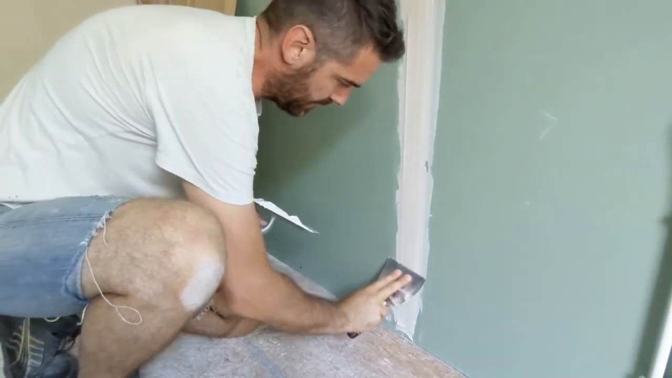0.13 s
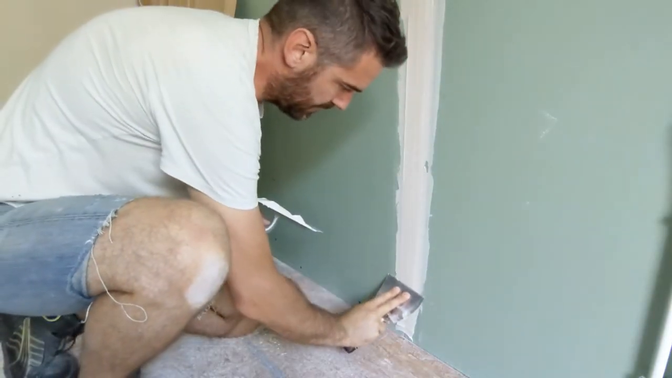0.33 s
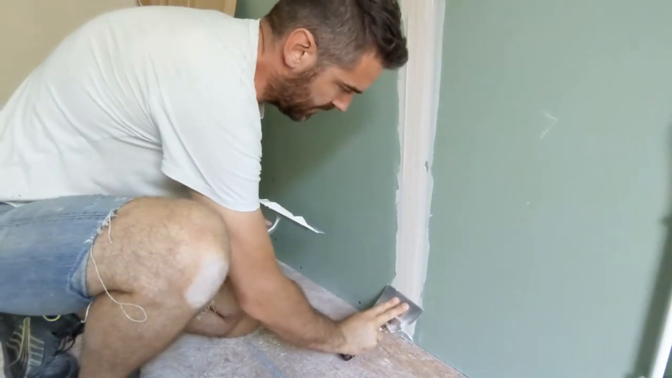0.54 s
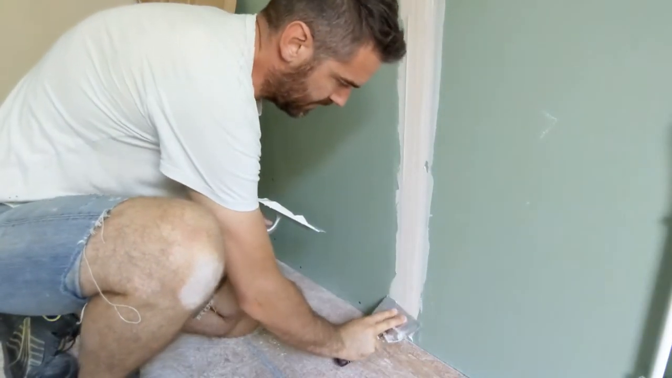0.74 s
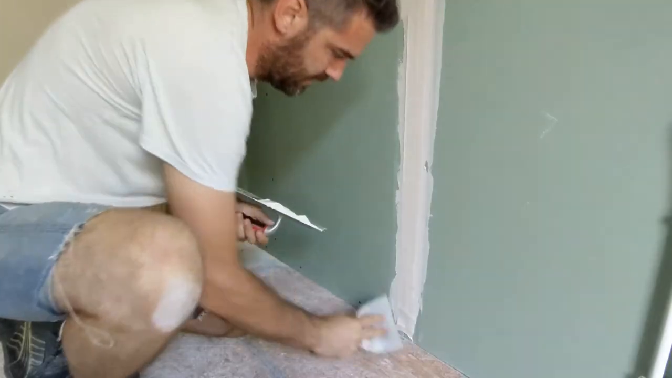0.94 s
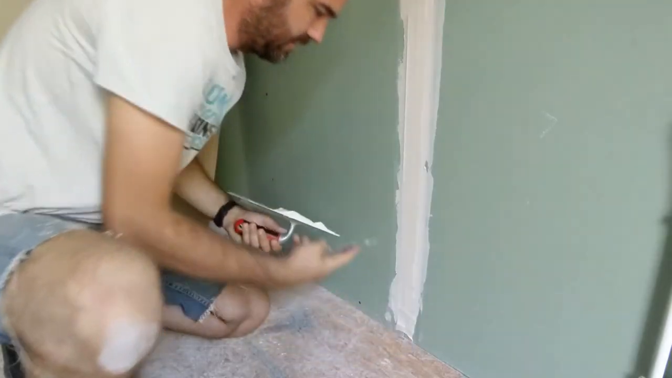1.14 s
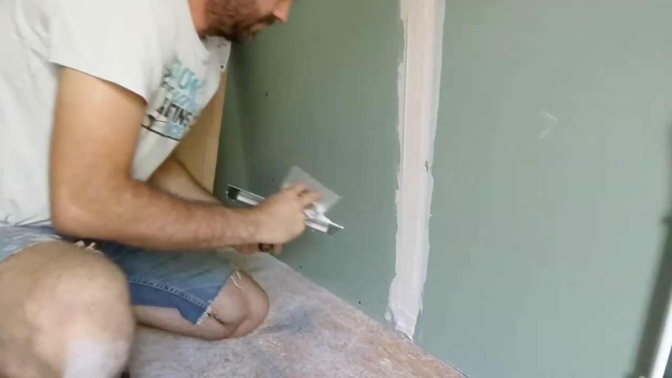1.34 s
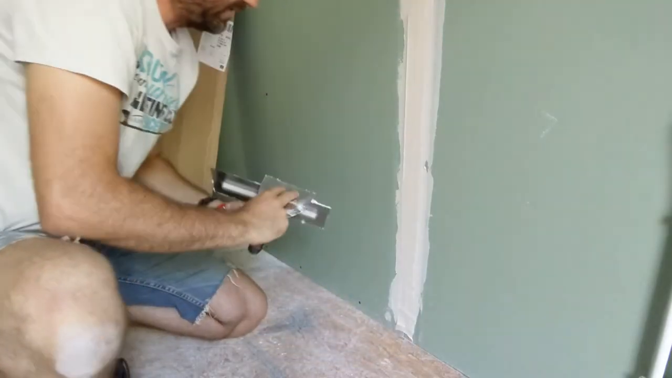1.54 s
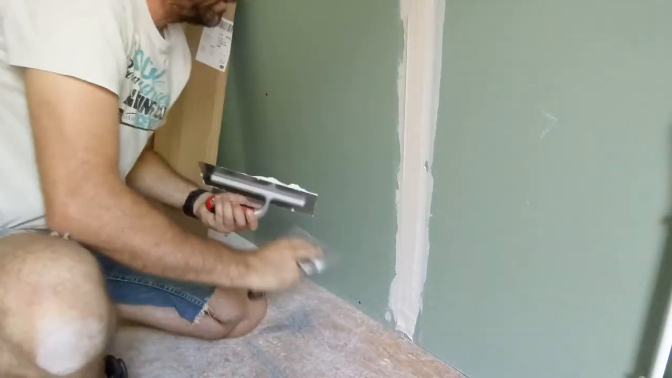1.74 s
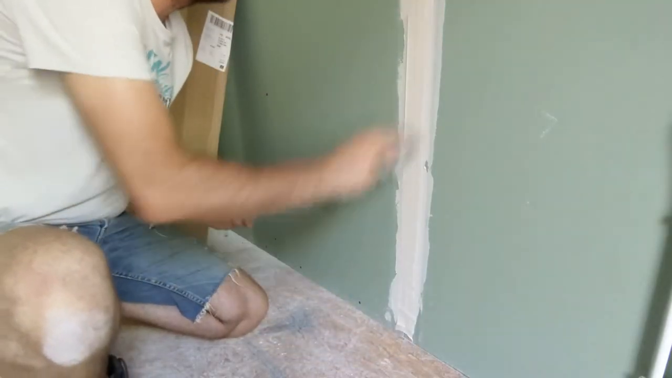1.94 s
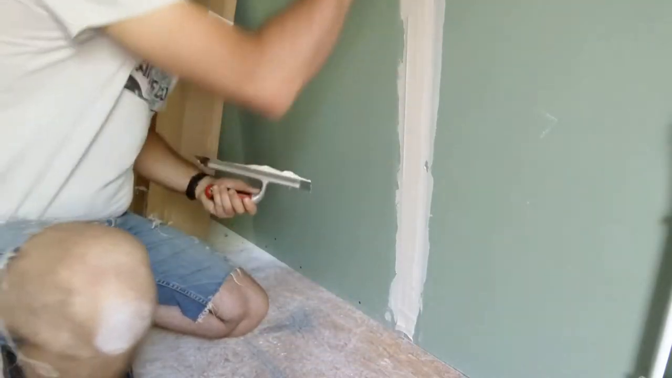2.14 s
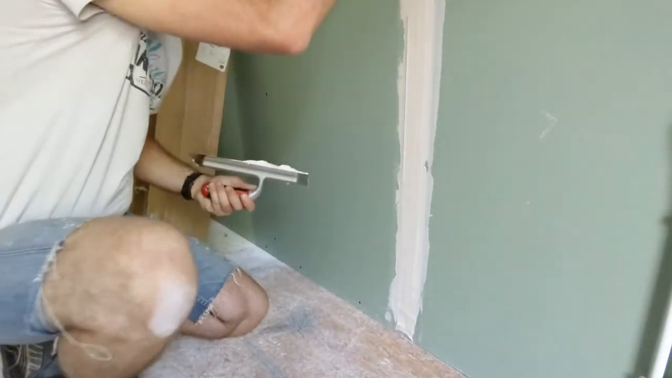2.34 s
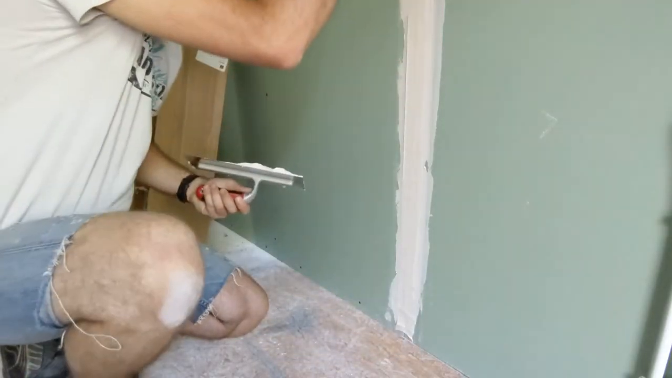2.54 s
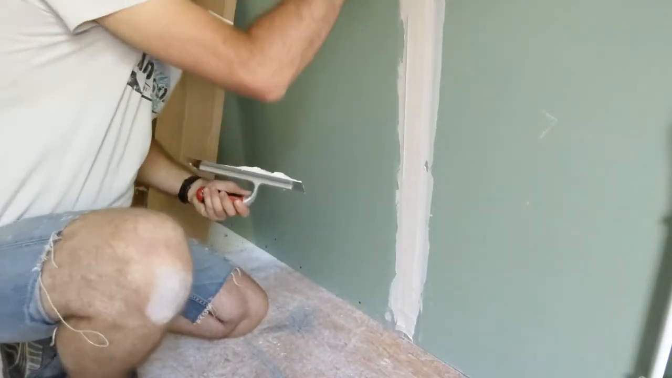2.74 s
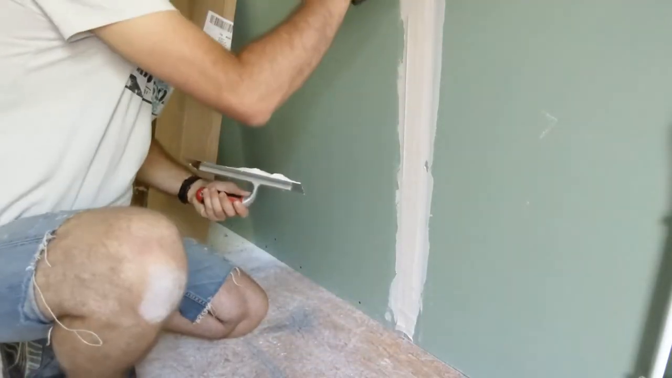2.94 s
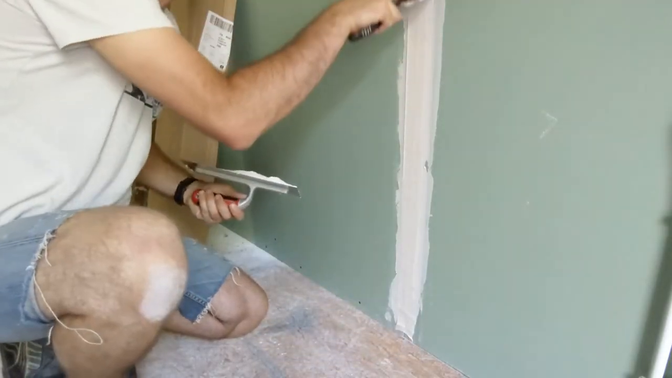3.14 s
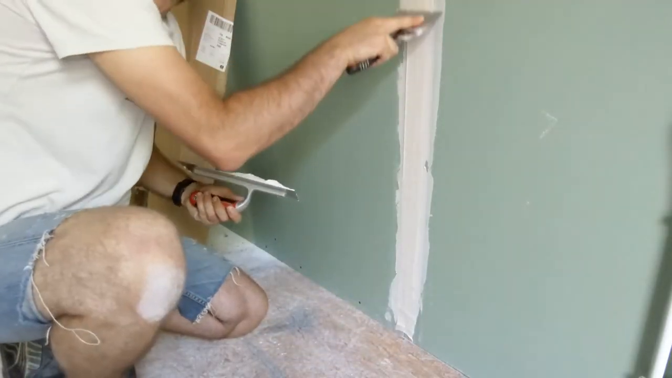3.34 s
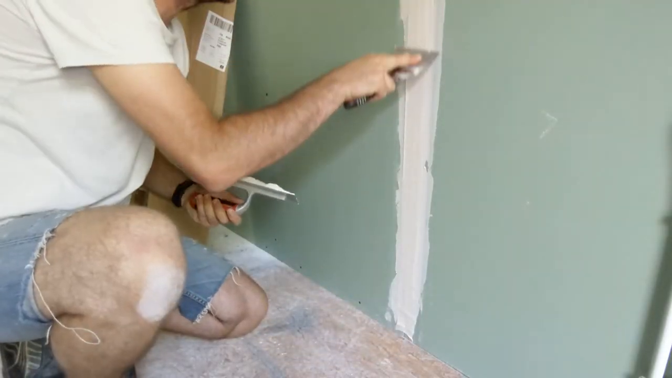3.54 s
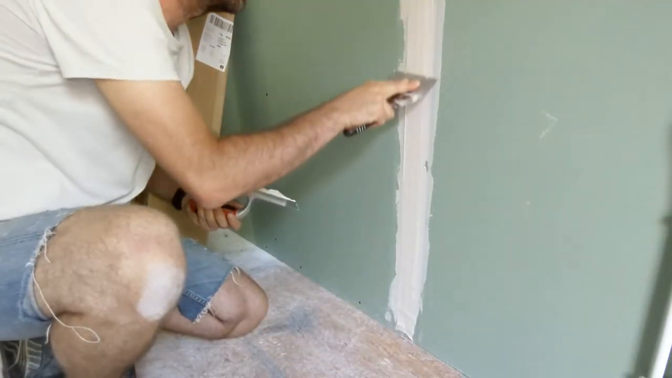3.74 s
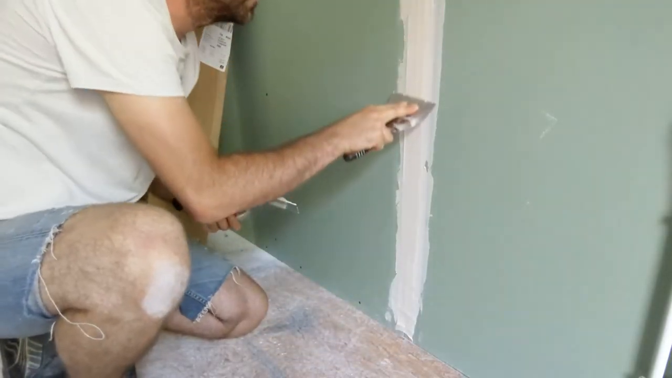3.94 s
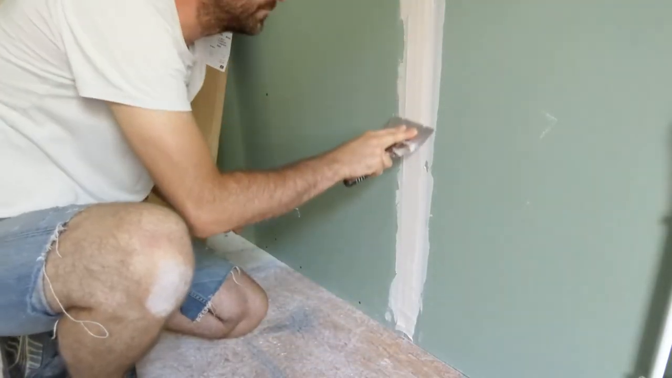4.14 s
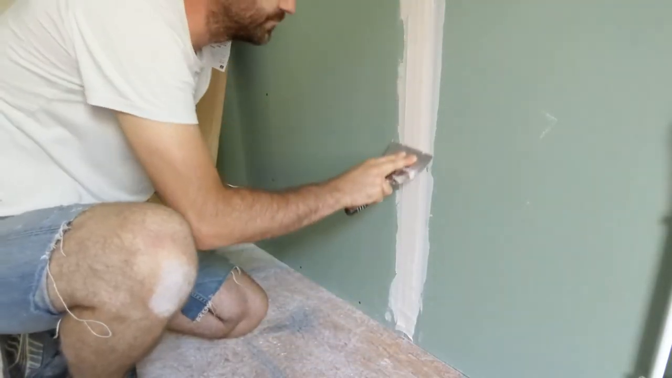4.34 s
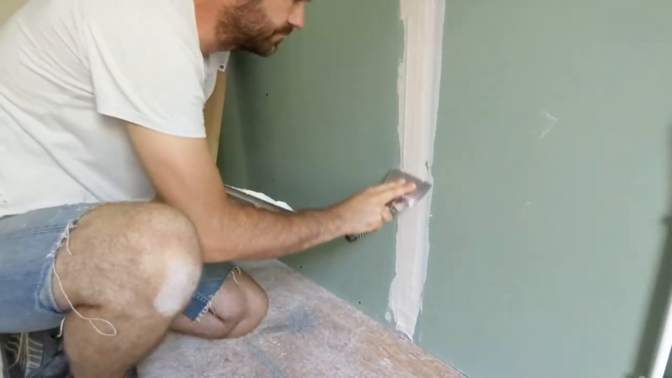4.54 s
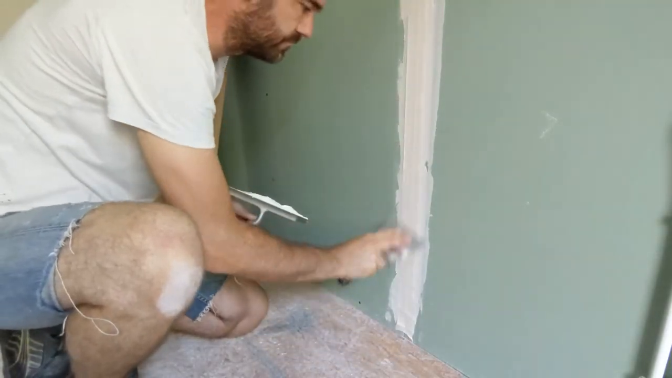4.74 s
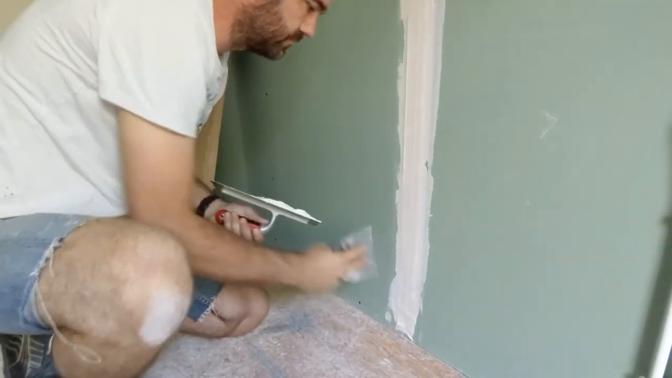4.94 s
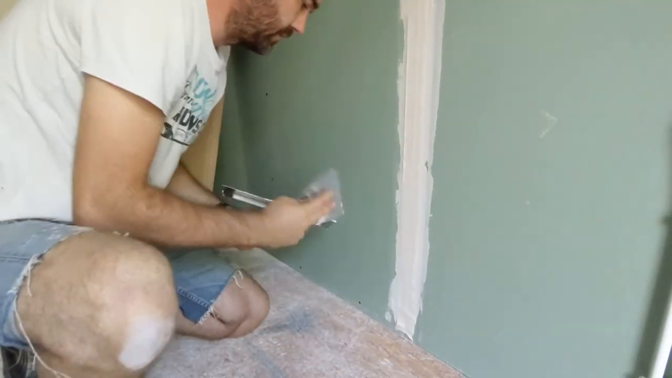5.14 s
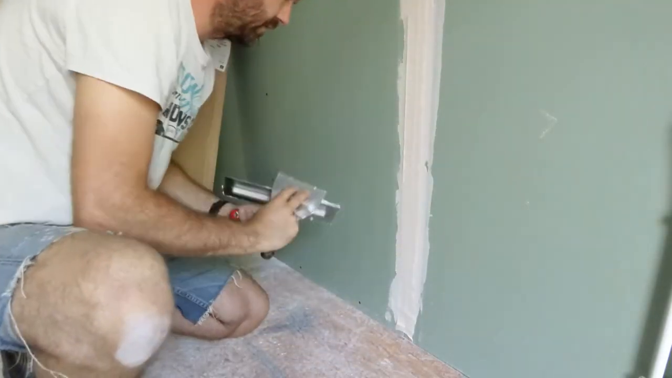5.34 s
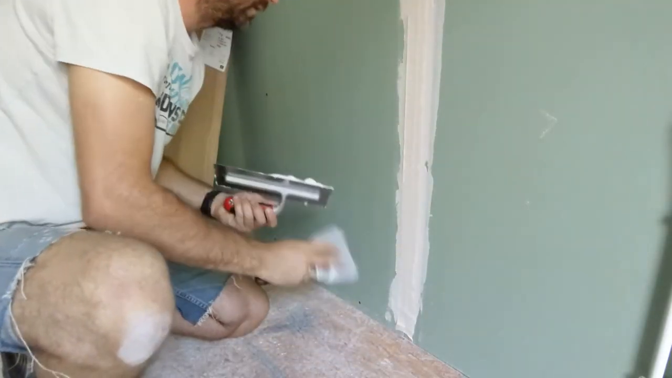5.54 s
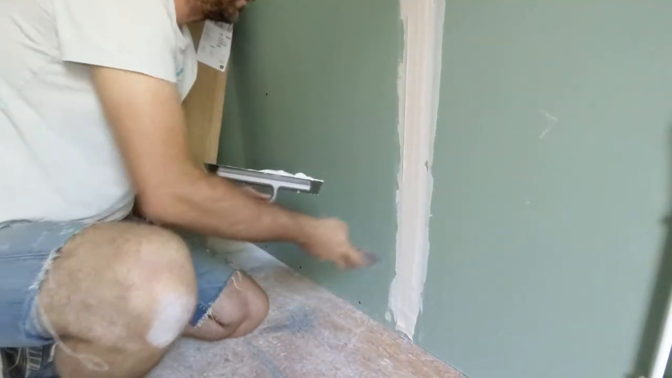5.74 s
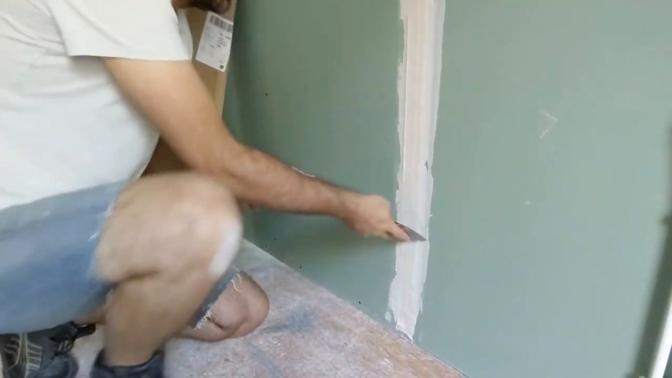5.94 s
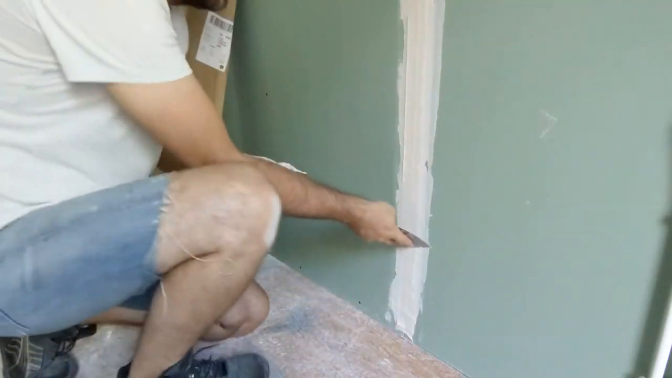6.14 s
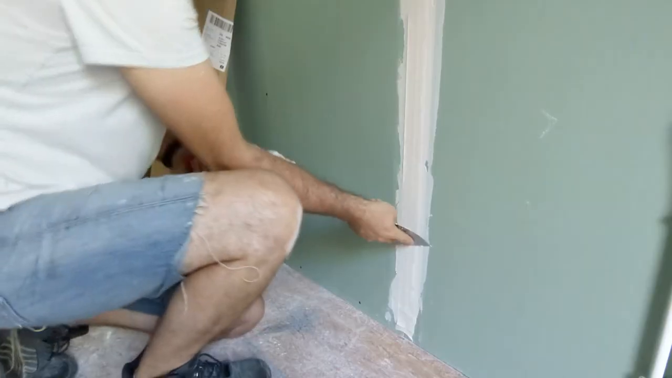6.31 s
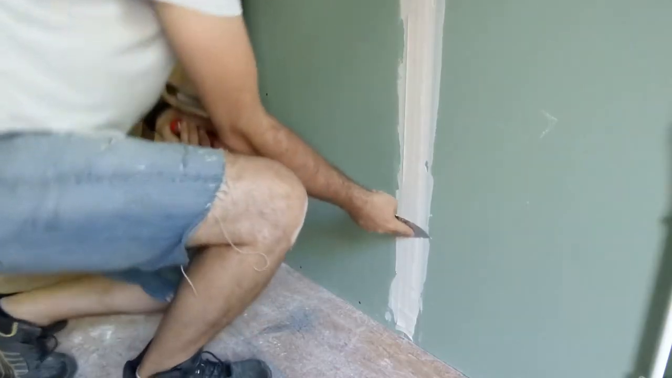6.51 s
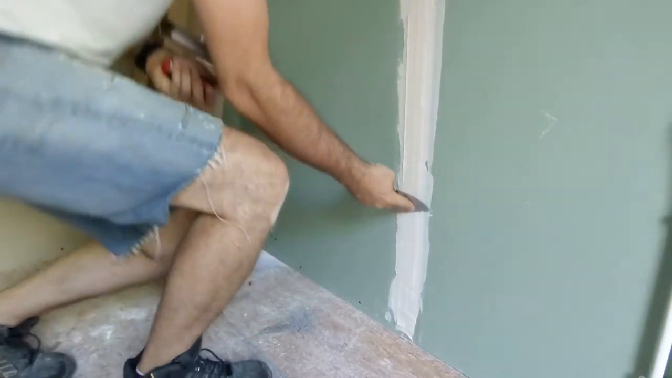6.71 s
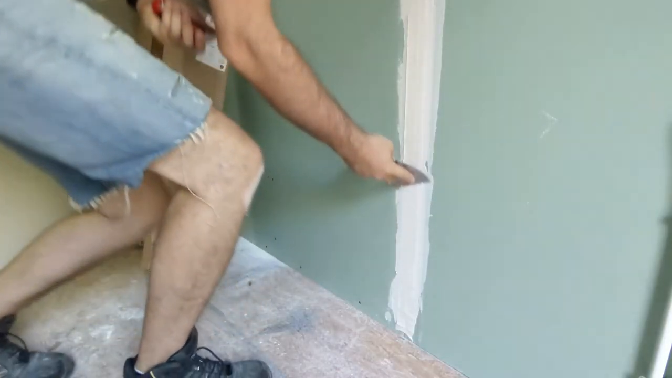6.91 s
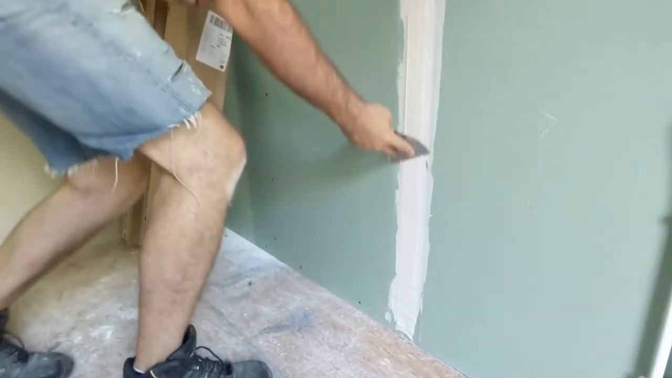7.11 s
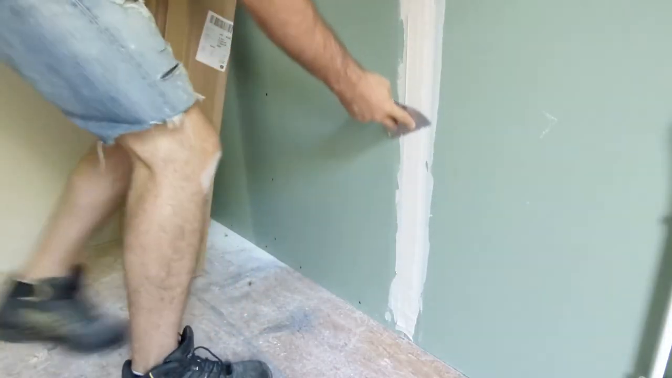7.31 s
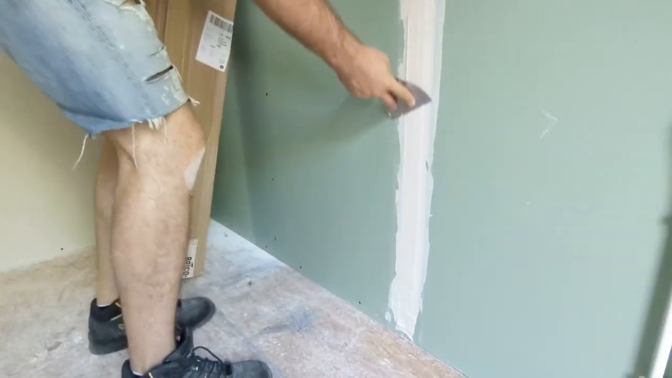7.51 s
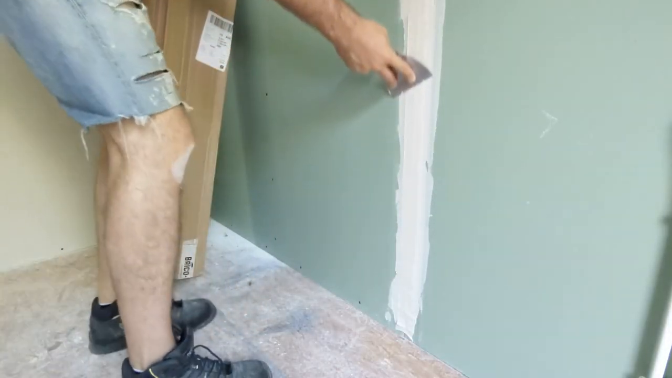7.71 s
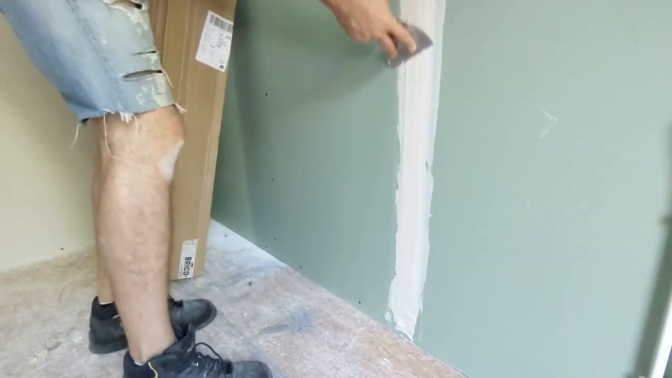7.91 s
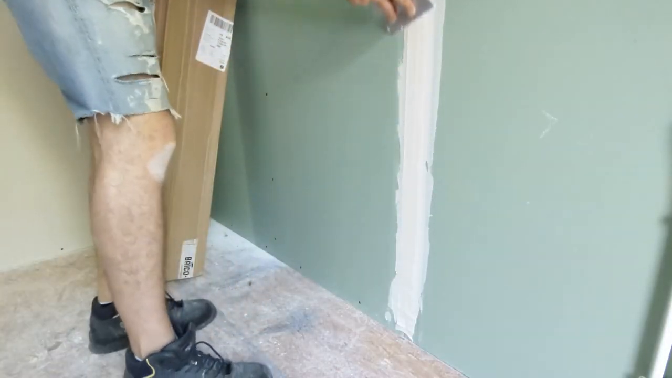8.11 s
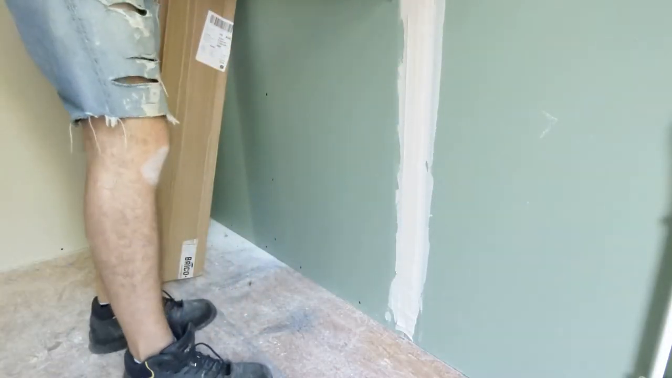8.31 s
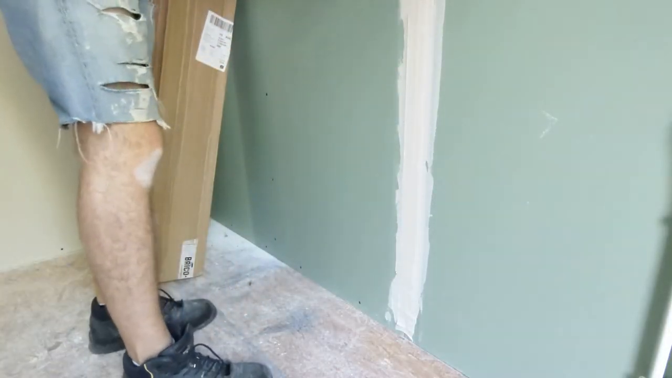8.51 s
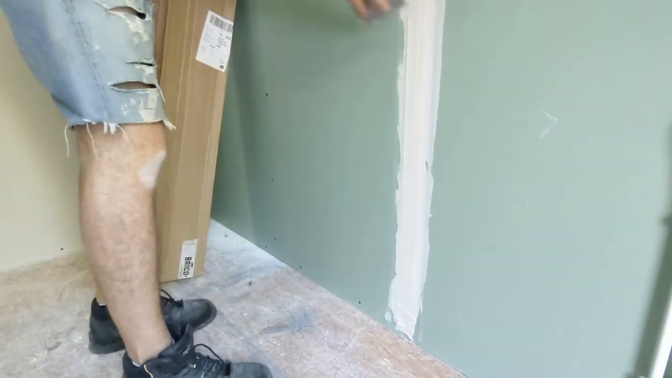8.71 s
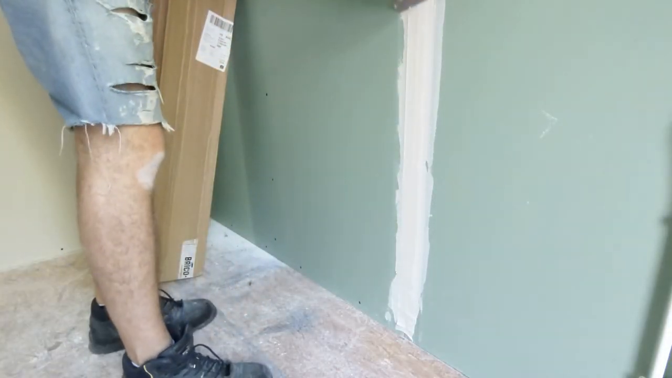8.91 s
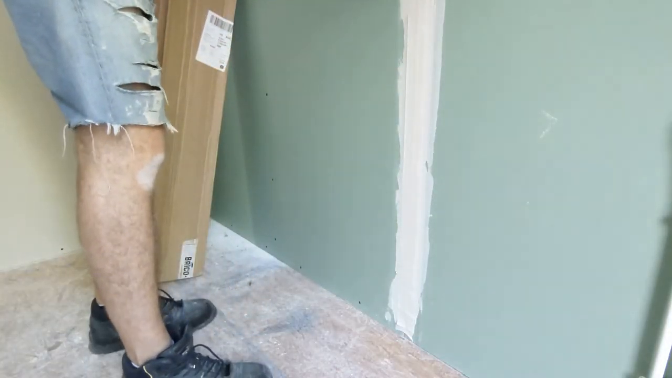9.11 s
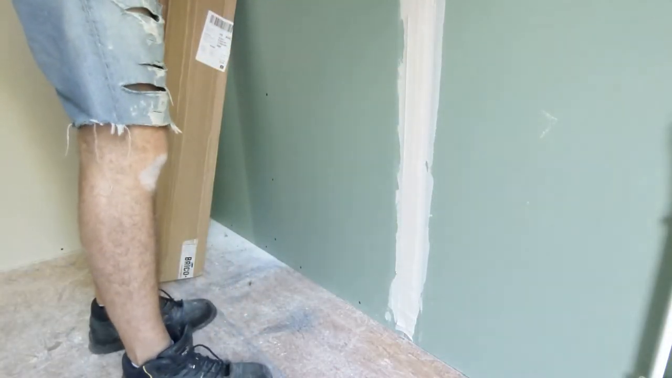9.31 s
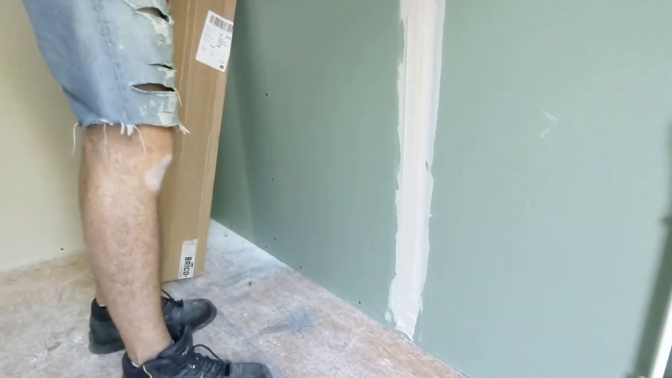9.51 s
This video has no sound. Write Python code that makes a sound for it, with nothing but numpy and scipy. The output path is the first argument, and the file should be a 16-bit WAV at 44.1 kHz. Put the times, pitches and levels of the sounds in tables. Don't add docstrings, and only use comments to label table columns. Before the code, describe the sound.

A worker smooths wet compound along a wallboard joint. Long, grainy scrapes with shifting metallic tones alternate with short wipes and clacks of blade on trowel. A tiny squeak and dry crumbs precede the hardest clack, then a boot lands heavily, and the blade strokes upward, with a second, lighter boot step. Nearby small stereo microphone, indoors, bare walls giving a short bright echo over low room air.

```python
import sys
import numpy as np
from scipy import signal
from scipy.fft import rfft, irfft, next_fast_len
from scipy.io import wavfile
from scipy.ndimage import uniform_filter1d

SR = 44100
rng = np.random.default_rng(int(sys.argv[2]) if len(sys.argv) > 2 else 0)


def to_wav(sig):
    pcm = np.clip(np.atleast_2d(sig), -1, 1) * 32767
    pcm = np.round(pcm).astype(np.int16)
    wavfile.write(sys.argv[1], SR, pcm.T)


def level_to_linear(level):
    exponent = np.asarray(level, float) / 20
    return 10 ** exponent


N = 426006


def unit(x):
    return x / np.sqrt(np.mean(np.abs(x) ** 2) + 1e-20)


def along(points, hz):
    f, value = np.transpose(points)
    return np.interp(np.log(hz + 1), np.log(f + 1), value)


def curves(rows, t):
    s, *columns = np.transpose(rows)
    return [np.interp(t, s, column) for column in columns]


def filtered(x, response):
    m = next_fast_len(N + 8192)
    return irfft(rfft(x, m) * response(np.fft.rfftfreq(m, 1 / SR)), m)[..., :N]


def bandpass(x, low_hz, high_hz):
    return signal.sosfilt(signal.butter(3, [low_hz, high_hz], "band", fs=SR, output="sos"), x)


# frequency in Hz, likeness from 0 to 1.
ALIKE = [(60, 0.925), (150, 0.902), (300, 0.697), (550, 0.378), (1650, 0.533), (4970, 0.122), (15000, 0.01)]


def ears(a, b, hz):
    turn = np.arccos(np.clip(along(ALIKE, hz), -1, 1)) / 2
    shared, own = np.cos(turn) * a, np.sin(turn) * b
    return np.array([shared + own, shared - own])


# frequency in Hz, time to fall by 60 dB in seconds.
ROOM = [(100, 0.22), (450, 0.759), (1500, 0.572), (5000, 0.4824), (14000, 0.1636)]


def room(x, wet_db):
    hz, t, z = signal.stft(rng.standard_normal((2, 3 * SR // 4)), SR, nperseg=256)
    z = ears(*z, hz[:, None]) * level_to_linear(-60 * t / along(ROOM, hz)[:, None])
    tail = signal.istft(z, SR, nperseg=256)[1]
    tail = np.pad(tail, ((0, 0), (round(.004 * SR), 0)))
    return level_to_linear(wet_db) * signal.oaconvolve(x, tail / np.linalg.norm(tail[0]), axes=1)


def add(out, s, hit, wet_db):
    wet = room(hit[None], wet_db)
    wet[:, :len(hit)] += hit
    spot = out[:, round(s * SR):][:, :wet.shape[1]]
    spot += wet[:, :spot.shape[1]]


def burst(t, t60):
    return rng.standard_normal(len(t)) * level_to_linear(-60 * t / t60)


def ring(modes, t, damping):
    out = np.zeros(len(t))
    for hz, db, t60 in modes:
        fade_db = db + rng.normal(0, 0.68) - 60 * t / (t60 * damping)
        out += level_to_linear(fade_db) * np.sin(2 * np.pi * hz * t)
    return out


# frequency in Hz, level in dB per Hz.
AIR = [(24, -22), (40, -8.5), (75, -14.5), (152, -21.5), (844, -36.5), (2090, -32.5), (3290, -31.5),
       (6660, -34), (8360, -36.5), (14900, -40.5), (16500, -62)]


def air():
    m = next_fast_len(N)
    hz = np.fft.rfftfreq(m, 1 / SR)
    noise = ears(*rfft(rng.standard_normal((2, m))), hz)
    return level_to_linear(-74.5) * unit(irfft(noise * level_to_linear(along(AIR, hz)), m)[:, :N])


# time in seconds, level in dB, half length in seconds.
SWAY = [(.05, -56.5, 0.1), (1.284, -59, 0.08), (1.985, -43, 0.047), (2.568, -47, 0.047),
        (2.997, -48.5, 0.807), (4.076, -50, 0.092), (4.6, -60, 0.274), (5.004, -43.5, 0.074),
        (5.505, -59.5, 0.94), (6.444, -35, 0.051), (6.707, -46.5, 0.067), (7.427, -45.5, 0.11),
        (7.873, -39, 0.047), (8.064, -43.5, 0.088), (8.648, -41.5, 0.113), (9.137, -50, 0.33),
        (9.508, -50.5, 0.082)]


def sway():
    def floor(hz):
        resonance = hz * 7 / np.abs(15 ** 2 - hz ** 2 + 6j * hz)
        return resonance / (1 + (hz / 30) ** 2.79)
    t = np.arange(N) / SR
    weight = level_to_linear(-58.5) + np.zeros(N)
    for s, db, half in SWAY:
        weight += level_to_linear(db) * np.exp(-((t - s) / half) ** 2)
    return level_to_linear(-5.0) * weight * unit(filtered(rng.standard_normal(N), floor))


# time in seconds, drag of the edge in dB, push into the board in dB.
DOWN_LOW = [(0, -48.5, -65.5), (.05, -46, -59), (.164, -61, -64), (.448, -55, -56), (.538, -65, -62.5),
            (.632, -55.5, -61), (.722, -60, -62), (.822, -53, -58), (.94, -57, -63)]
DOWN_LONG = [(2.53, -67, -81), (2.62, -56, -69), (2.86, -52, -57), (2.98, -54.5, -59.5), (3.12, -51.5, -57),
             (3.35, -56.5, -58.5), (3.65, -49.5, -54), (3.8, -56, -57), (4.55, -54.5, -60)]
DOWN_END = [(4.55, -54, -50.5), (4.78, -50, -59.5), (4.929, -47.5, -62)]
UP_LONG = [(6.3, -67.5, -69), (6.6, -60, -68.5), (6.77, -53, -65.5), (7.0, -54.5, -63), (7.3, -56.5, -56.5),
           (7.55, -59, -65), (7.95, -55.5, -57), (8.48, -51.5, -60), (8.62, -55, -73.5)]
UP_HIGH = [(9.03, -59, -69.5), (9.091, -61, -74), (9.171, -50, -79), (9.241, -53.5, -64.5),
           (9.321, -54.5, -61.5), (9.561, -54, -62.5), (9.66, -54.5, -58.5)]
# peak time in seconds, drag in dB, push in dB, swell in seconds, fall by 20 dB in seconds.
RUBS = [(0.914, -41.5, -71.5, 0.0218, 0.0639), (1.25, -66, -70, 0.128, 0.16),
        (1.32, -74, -58, 0.0017, 0.01), (1.41, -75, -70, 0.11, -0.33), (1.531, -79.5, -70, 0.112, -1.8),
        (1.665, -59.5, -52.5, 0.0063, 0.09), (1.8, -54.5, -68, 0.126, 0.1752),
        (1.969, -65.5, -60.5, 0.123, 0.3672), (2.428, -69.5, -59, 0.0087, 0.02),
        (2.503, -70.5, -59.5, 0.0053, 0.22), (4.906, -37, -77, 0.1276, 0.0881),
        (5.512, -25, -51.5, 0.003, 0.0125), (5.53, -48, -84, 0.0036, 0.2021),
        (5.63, -51.5, -63.5, 0.1185, 0.0735), (5.97, -71, -68, 0.245, 2.5),
        (6.004, -64.5, -55.5, 0.0094, 0.26), (6.091, -53.5, -52, 0.1076, 0.0538),
        (6.17, -47.5, -41.5, 0.045, 0.13), (6.288, -78.5, -44.5, 0.14, 0.0772),
        (6.518, -73, -52.5, 0.167, 0.18), (7.659, -58.5, -39, 0.022, -0.0158),
        (8.14, -57.5, -58.5, 0.18, 0.4233), (8.563, -38.5, -58.5, 0.092, 0.08),
        (9.049, -64.5, -53, 0.0362, 0.16), (2.45, -84.5, -66, 0.028, -0.4)]


def edge(t):
    land_db_per_s, lift_db_per_s, board_fades_db_per_s = 3001.5, 149, 46.5
    leave = [lift_db_per_s, board_fades_db_per_s]
    power = level_to_linear([[-93.5], [-81]]) ** 2 + 0 * t
    for rows in (DOWN_LOW, DOWN_LONG + DOWN_END[1:], UP_LONG, UP_HIGH):
        early = np.maximum(rows[0][0] - t, 0)
        late = np.maximum(t - rows[-1][0], 0)
        power += level_to_linear(curves(rows, t) - land_db_per_s * early - np.outer(leave, late)) ** 2
    for s, drag_db, push_db, rise, fall in RUBS:
        rise, fall = abs(rise), abs(fall)
        below_db = np.maximum(17.5 * (s - t) / rise, 20 * (t - s) / fall)
        below_db = below_db + land_db_per_s * np.maximum(s - rise - t, 0)
        power += level_to_linear(np.array([[drag_db], [push_db]]) - below_db) ** 2
    return np.sqrt(power)


# time in seconds, first tone in Hz, its lift in dB, second tone in Hz, its lift in dB.
BEND_DOWN = [
    [(0, 1763, 12.5, 3990, 10), (.12, 1740, 6.5, 3960, 1), (.3, 1000, -7.5, 3800, -1),
     (.45, 775, 1.5, 3720, -2.5), (.8, 1020, 2.5, 3300, 1), (.93, 814, 9.5, 3280, 2.5),
     (1.15, 824, -3, 3300, 1.5)],
    [(2.58, 1500, 9, 3520, -1), (2.64, 1750, 6.5, 2998, 1.5), (2.72, 1300, 3, 3500, -1),
     (2.85, 1190, 0, 3880, 5.5), (3.0, 1290, -0.5, 4080, 7), (3.15, 1587, 6, 4193, 7),
     (3.35, 1200, 5, 4234, 6.5), (3.5, 710, 3.5, 4200, 1.5), (3.65, 1603, 7, 4360, 2),
     (3.95, 1220, -0.5, 4600, 3), (4.62, 1578, 8, 4570, 2.5), (4.8, 1338, 7, 3974, 6),
     (5.0, 1200, 1, 3540, 2)],
]
BEND_UP = [
    [(6.3, 493, 6.6, 3280, 6.5), (6.58, 670, 7.5, 3400, -3), (6.72, 1337, 5.36, 3267, 2),
     (7.19, 1546, 5.2, 3410, 3.5), (7.23, 520, 6.2, 3420, 4.5), (7.45, 480, 5.2, 3510, 5),
     (7.52, 1300, 1.8, 3566, 6), (8.06, 1345, 4.2, 4170, 0), (8.14, 1588, 17.13, 3980, 1.5),
     (8.28, 1037, 8.96, 3790, 2.5), (8.46, 1272, 9.4, 3950, -1), (8.57, 880, 3.9, 3480, 7.5)],
    [(9.13, 1320, 3.5, 2910, 4.5), (9.17, 1480, 7.6, 3430, 6.4), (9.23, 1552, 7.7, 4160, 8.4),
     (9.32, 1480, 5, 3690, 2.8), (9.45, 1478, 9.5, 3690, 7.1), (9.55, 1446, 5.9, 3930, 5.4),
     (9.66, 1500, 3.8, 4090, 5.2)],
]


def flex(t):
    straight = (930, 4.05, 3300, 3.56)  # Hz, dB, Hz, dB
    spring_s = .2
    first, *others = BEND_DOWN + BEND_UP
    rows = list(first)
    for bent in others:
        rows += [(rows[-1][0] + spring_s, *straight), (bent[0][0] - spring_s, *straight), *bent]
    return curves(rows, t)


def patches(shape, patchy_db):
    field = uniform_filter1d(rng.standard_normal(shape), size=4, axis=0)
    return level_to_linear(patchy_db * unit(uniform_filter1d(field, size=9, axis=1)))


# frequency in Hz, level in dB per Hz.
GRIT = [(290, -55), (500, -28), (1540, -2.5), (2070, -2.5), (4170, -3), (8420, -9.5), (15100, -10.5),
        (16500, -29.5)]
# frequency in Hz, level in dB per Hz.
BOARD = [(24, -20.5), (40, -2), (49, -3.5), (101, -8.5), (197, -2.5), (535, -2), (677, -7), (800, -4),
         (1100, -11), (1430, -70), (2420, -120)]
# time in seconds, half length in seconds, treble lift in dB.
WIPES = [
    (1.756, 0.0637, 18),
    (5.625, 0.0727, 13),
]


def scrape():
    ms = np.arange(0, N / SR, 1 / 1000)
    drag, push = (np.interp(np.arange(N) / SR, ms, gain) for gain in edge(ms))
    grains = unit(level_to_linear(3.2 * rng.standard_normal(N)))
    hz, t, z = signal.stft(grains * rng.standard_normal((2, 3, N)), SR, nperseg=1024)
    f = hz[:, None]

    def mode(centre_hz, sharp):
        width = f * centre_hz / sharp
        return np.abs(width / (centre_hz ** 2 - f ** 2 + 1j * width)) ** 2

    first_hz, first_db, second_hz, second_db = flex(t)
    bend_db = first_db * mode(first_hz, 8) + 1.3 * second_db * mode(second_hz, 11)
    bend_db += 0.635 * second_db * mode(1.97 * second_hz, 14.0)
    bend_db += 0.33 * second_db * mode(1.514 * second_hz, 13.84)
    for s, half, db in WIPES:
        bend_db += db * np.exp(-((t - s) / half) ** 2) * f / 14000

    grit_colour = unit(level_to_linear(along(GRIT, f))) + 0 * t
    face_colour = unit(mode(1172, 0.73) / (1 + (f / 2100) ** 4))
    face_colour = face_colour * level_to_linear(0.387 * (first_db - 5))
    board_colour = unit(level_to_linear(along(BOARD, f))) + 0 * t
    colours = np.array([grit_colour, face_colour, board_colour])
    colours = colours * level_to_linear(bend_db) * patches(z.shape[2:], patchy_db=1.97)
    layers = signal.istft(ears(*z, f) * colours, SR, nperseg=1024)[1][..., :N]
    grit, face, board = layers.swapaxes(0, 1)

    face_drag = level_to_linear(-57.5) * (drag / level_to_linear(-54)) ** 0.843
    face_gain = np.hypot(face_drag, level_to_linear(-4.5) * push)
    dry = drag * grit + face_gain * face + level_to_linear(1.5042) * push * board
    return level_to_linear(0.5) * dry + room(dry, wet_db=-6.5)[:, :N]


# time in seconds, peak in dB, low knock in dB against the peak,
# bright crack in dB against the peak, loudest ring in Hz.
CLACKS = [(.925, -47.5, -33, -11.5, 810), (1.312, -50, -17.5, -16.5, 950), (1.325, -51.5, -19.5, -30, 564),
          (1.512, -50.5, -28, -15.5, 800), (2.417, -58.5, -20, -25.5, 903), (1.66, -42, 5.5, -12, 1650),
          (1.668, -44.5, -6.5, -30, 480), (1.796, -37.5, -10, 2, 1044), (2.428, -50, -15, -20, 956),
          (2.5, -49.5, 3.5, -15, 700), (5.508, -25, -4.5, 0.5, 1157), (5.998, -38.5, -28, -14.5, 995),
          (9.019, -41, -17.5, -7.5, 1158), (9.037, -40.5, -11.5, -24.5, 817), (9.055, -46, -8, -25, 700)]
# frequency in Hz, level in dB, time to fall by 60 dB in seconds.
STEEL = [(1055, -28, 0.12), (1470, -14, 0.12), (3180, -41.5, 1.1), (4330, 5.5, 0.13), (5645, 8.5, 0.453),
         (6050, -18, 0.18), (6772, -50.5, 0.077), (8200, -17.5, 0.32), (8807, -10.5, 0.11)]
# frequency in Hz, level in dB, time to fall by 60 dB in seconds.
HANDLE = [(306.5, -8, 0.5), (364.2, -4.5, 0.321), (410, -14, 0.08)]


def clacks():
    out, t = np.zeros((2, N)), np.arange(SR // 3) / SR
    small = signal.butter(2, 230, "high", fs=SR, output="sos")
    for s, db, low_db, crack_db, ring_hz in CLACKS:
        tap = level_to_linear(10) * bandpass(burst(t, 0.0198), 0.422 * ring_hz, 1.434 * ring_hz)
        held = level_to_linear(-3.5) * ring([(ring_hz, 0, 0.0357)], t, 0.98)
        knock = level_to_linear(low_db - 2.5) * ring(HANDLE, t, 0.424)
        crack = level_to_linear(4.5) * signal.lfilter([.55], [1, -.45], burst(t, 0.0127))
        bright = level_to_linear(-19.0) * ring(STEEL, t, 0.044) + crack
        hit = tap + held + knock + level_to_linear(crack_db) * bright
        add(out, s, level_to_linear(db) * signal.sosfilt(small, hit), wet_db=-0.5)
    return out


# time in seconds, level in dB, pitch in
# Hz, time to fall by 60 dB in seconds.
TWANGS = [(.926, -49.5, 845, 0.44), (1.664, -47.5, 1077, 0.203), (1.42, -72, 1600, .3),
          (1.06, -71.5, 1700, .6), (1.085, -59, 830, .25), (5.508, -32.5, 1055, 0.137),
          (5.508, -29, 1360, 0.066), (5.508, -36.5, 775, 0.13), (5.508, -35.5, 1448, 0.117),
          (8.56, -47, 880, 0.24), (8.575, -52.5, 960, 0.47), (9.137, -58, 2380, .2),
          (5.085, -57, 320, 0.11)]


def twangs():
    out, t = np.zeros((2, N)), np.arange(SR // 3) / SR
    for s, db, hz, t60 in TWANGS:
        add(out, s, ring([(hz, db, t60)], t, 1), wet_db=-1.0)
    return out


# time in seconds, peak in dB, then slap, crack and slab swing,
# each in dB against the peak.
THUDS = [
    (3.489, -44.5, -32, -20.5, -22),
    (6.1376, -13.5, -7, -24, -17),
    (7.594, -27.5, 0.5, -39.5, -5.5),
]
# low edge in Hz, high edge in Hz.
SOLES = [
    (550, 1700),
    (800, 1885),
    (700, 1550),
]
# frequency in Hz, level in dB, time to fall by 60 dB in seconds.
PALM = [(190.2, 11.5, 0.77), (397, -5.5, 0.57), (710, 4.5, 1.67)]
SLAB = [(184.8, -0.5, 0.71), (206.6, 2.5, 0.69), (281.6, 0, 0.707), (322.2, 6, 0.503), (443.2, 3, 0.64),
        (483.6, 0.5, 0.784), (533.7, 3, 0.678), (599.8, -4.5, 0.74), (685.6, -7.5, 1.09),
        (972.6, -12, 0.34), (1307, -10, .4), (1500, -13, .5), (1636, -12, .4), (2157, -11.5, .06)]
HEEL = [(87.5, 6, 0.586), (193.2, 11, 0.234), (258.7, 8, 0.235), (420.3, -0.5, 0.287), (556.3, 6, 0.184),
        (787, -13.5, 0.48), (710.7, -2, 0.59), (882.5, -0.5, 0.57), (1025.4, 1, 0.288), (1200, -2.5, .3),
        (1403, -2.5, 0.32)]


def thuds():
    out, t = np.zeros((2, N)), np.arange(SR // 2) / SR
    for thud, body, band_hz in zip(THUDS, (PALM, SLAB, HEEL), SOLES):
        s, db, slap_db, crack_db, swing_db = thud
        slap = level_to_linear(slap_db + 14) * bandpass(burst(t, 0.027), *band_hz)
        crack = level_to_linear(crack_db + 20) * signal.lfilter([.3], [1, -.7], burst(t, 0.0244))
        rise_s = 0.00583 * level_to_linear(0.5 * db)
        hit = (level_to_linear(-7.0) * ring(body, t, 0.211) + slap + crack) * (1 - np.exp(-t / rise_s))
        add(out, s, level_to_linear(db) * hit, wet_db=-2.0)
        swing = -level_to_linear(db + swing_db + 6.0 - 60 * t / 0.605) * np.sin(2 * np.pi * 21 * t)
        out[:, round(s * SR):][:, :len(t)] += swing
    return out


# time in seconds, peak in dB, pitch in Hz.
TICKS = [
    (5.072, -53.5, 11500),
    (5.443, -46.5, 3650),
    (6.095, -47.5, 12100),
    (6.244, -51, 13500),
]


def crumbs():
    out, t = np.zeros((2, N)), np.arange(SR // 3) / SR
    for s, db, hz in TICKS:
        tick = bandpass(burst(t, 0.018), 0.77 * hz, min(1.516 * hz, SR / 2.2))
        add(out, s, level_to_linear(db) * tick, wet_db=1)
    return out


# time in seconds, pitch in Hz, level in dB.
SQUEAK = [(5.13, 7730, -100), (5.2, 7920, -81), (5.3, 8200, -90), (5.37, 8670, -77.5), (5.41, 8700, -80.5),
          (5.44, 8700, -100)]


def squeak():
    t = np.arange(N) / SR
    hz, db = curves(SQUEAK, t)
    waver = unit(uniform_filter1d(rng.standard_normal(N), size=200))
    tone = np.sin(2 * np.pi * np.cumsum(hz + 40 * waver) / SR)
    return (t > SQUEAK[0][0]) * (t < SQUEAK[-1][0]) * level_to_linear(db) * tone


def scene():
    return air() + sway() + scrape() + clacks() + twangs() + thuds() + crumbs() + squeak()


def band_limit(x):
    return signal.sosfilt(signal.butter(12, 16970, fs=SR, output="sos"), x)


# frequency in Hz, width in Hz, lift in dB.
PORTS = [(4819, 310, -0.5), (6620, 260, -1), (5664, 447, 5), (7524, 454, 4.5), (9592, 680, 4.5),
         (11846, 435, 5), (14790, 480, 5.5)]
# frequency in Hz, left minus right in dB.
LEAN = [(60, 1), (150, -0.5), (380, 2.0), (950, 4), (2380, 3), (5980, 2.5), (15000, 13)]


def record(dry):
    def ports(hz):
        peaks_db = -2.884 * (hz > 4500) - 22 * (hz > 15850)
        for centre_hz, width_hz, db in PORTS:
            peaks_db = peaks_db + db * np.exp(-((hz - centre_hz) / width_hz) ** 2)
        lean_db = along(LEAN, hz)
        return level_to_linear(peaks_db + np.array([[.5], [-.5]]) * lean_db - 0.135 * np.abs(lean_db))
    return band_limit(filtered(dry, ports))


dry = scene()
out = record(dry)
to_wav(out)
```